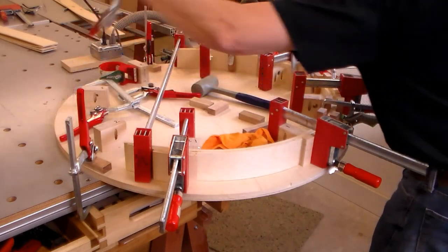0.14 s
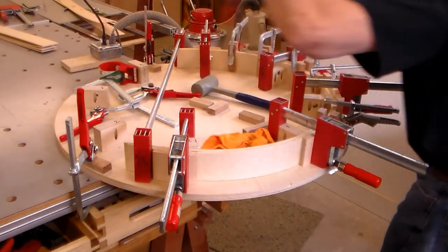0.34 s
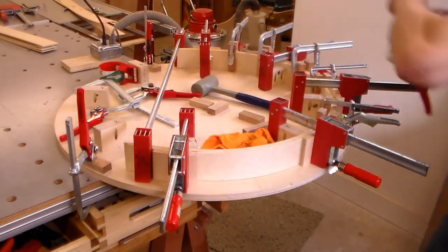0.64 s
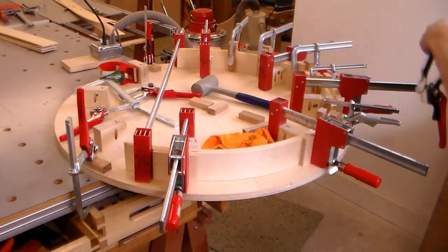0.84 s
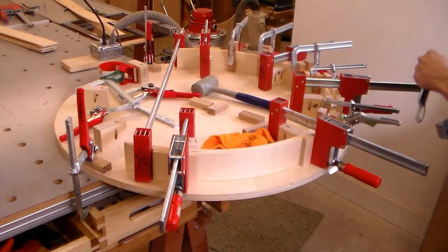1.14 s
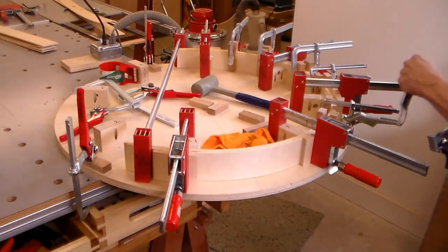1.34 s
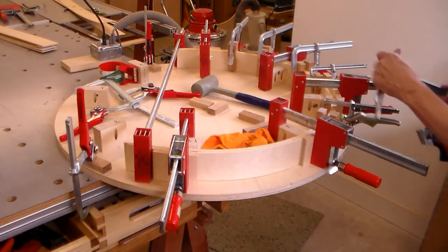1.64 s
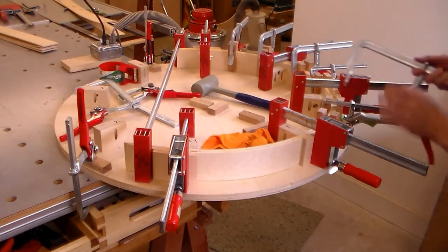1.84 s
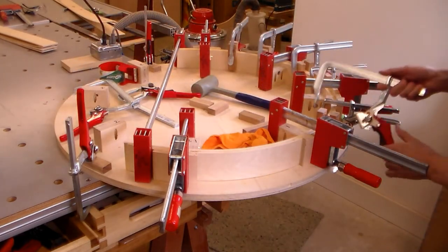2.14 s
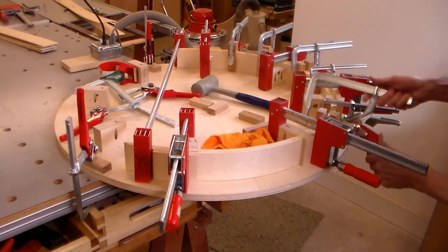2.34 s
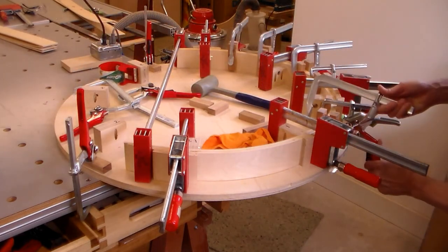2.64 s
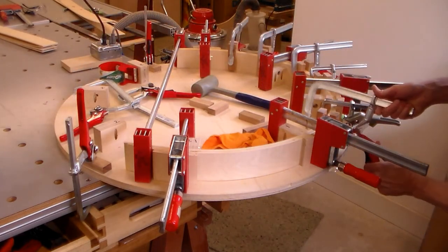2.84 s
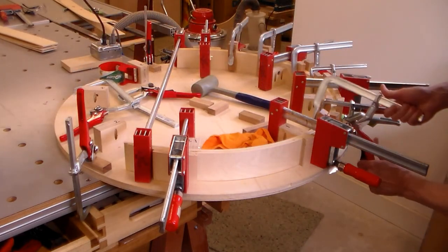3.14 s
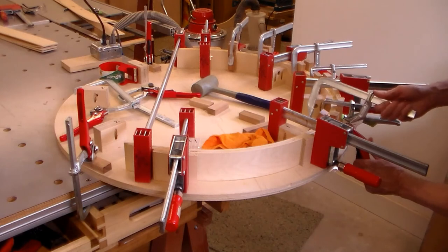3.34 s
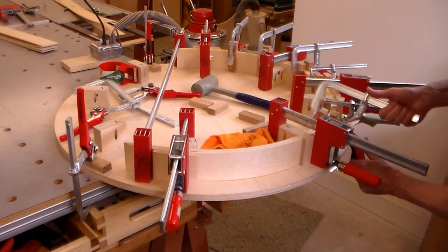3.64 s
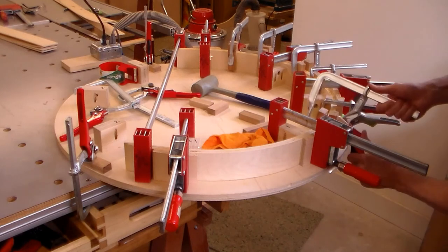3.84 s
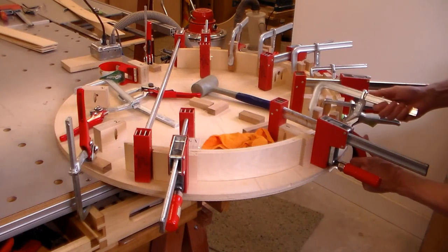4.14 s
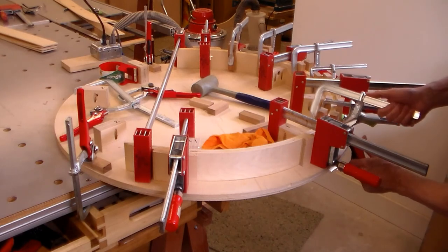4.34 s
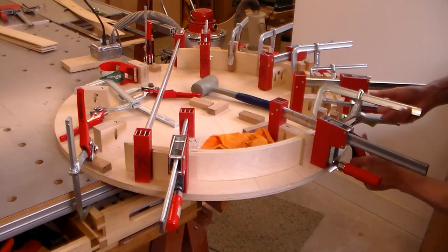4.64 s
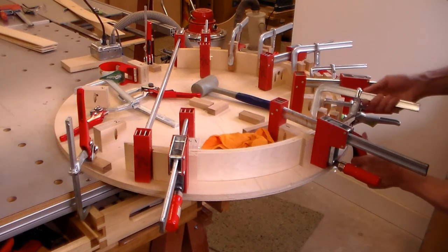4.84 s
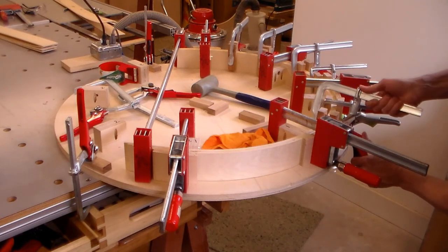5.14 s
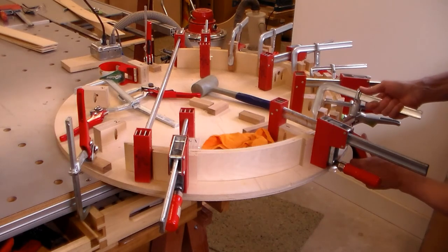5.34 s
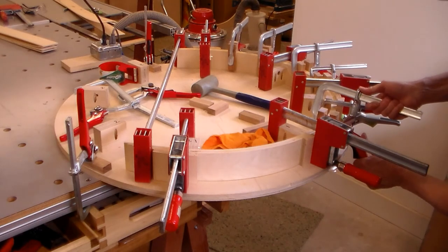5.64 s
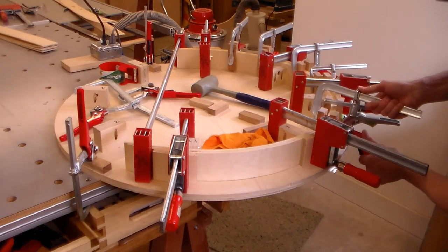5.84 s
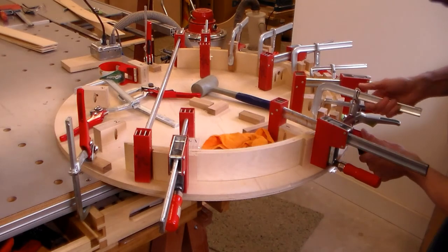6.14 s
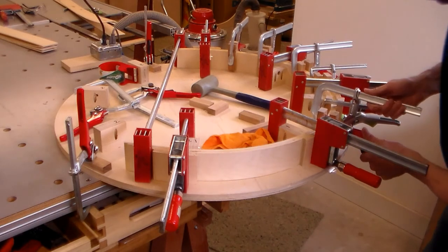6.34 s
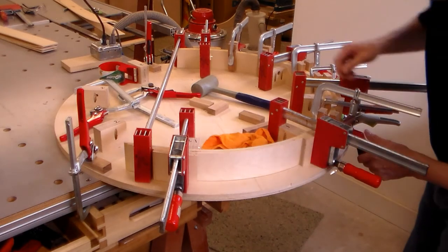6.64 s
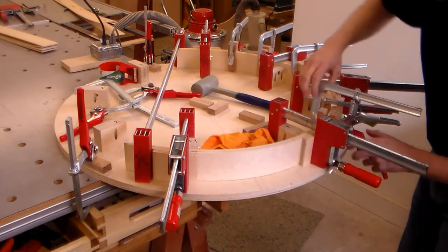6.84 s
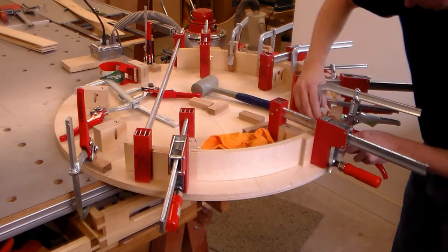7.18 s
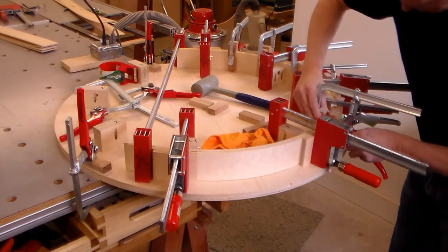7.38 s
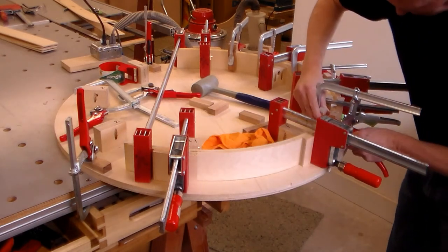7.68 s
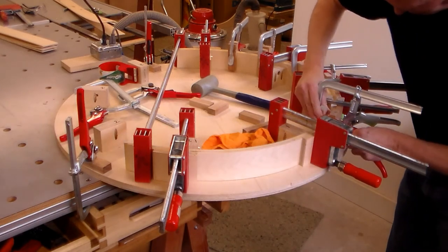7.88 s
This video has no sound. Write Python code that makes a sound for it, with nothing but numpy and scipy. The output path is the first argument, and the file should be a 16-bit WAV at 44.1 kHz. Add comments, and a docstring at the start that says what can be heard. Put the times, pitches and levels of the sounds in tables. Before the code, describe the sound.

Steel bar clamps clink, scrape and knock against each other and a wooden form in a small workshop, over a faint hum.

```python
"""Steel bar clamps are slid open, knocked together and set on a wooden form on a workbench.
Bars and jaws ring when struck and chatter as they slide; the wood knocks and rubs, the bench thumps.
The work sits a touch right of a camera's stereo microphone, in a small workshop that answers each blow.
Behind it a motor hums faintly in rumble and hiss. The gain control ducks after the loudest blows."""
import sys
import numpy as np
from scipy import signal
from scipy.fft import rfft, irfft, next_fast_len
from scipy.io import wavfile
from scipy.ndimage import uniform_filter1d, minimum_filter1d, map_coordinates

SR = 44100
rng = np.random.default_rng(int(sys.argv[2]) if len(sys.argv) > 2 else 0)


def unload_wav(signal):
    """Save mono or channel-first audio to the path in sys.argv[1] as 16-bit WAV at rate SR, clipped to [-1, 1]."""
    wavfile.write(
        sys.argv[1],
        SR,
        np.round(np.clip(np.atleast_2d(signal).T, -1, 1) * 32767).astype(np.int16),
    )


N = 353241
LIFE = int(.6 * SR)  # samples allowed for one ring or room tail

# A clamp meets wood. Each row: start in seconds, level in dB, contact hardness as a treble corner in Hz,
# seconds until it settles (up to 0.005 it lands flat).
WOOD_KNOCKS = [(0.326, -48, 950, 0.0025), (0.595, -32, 1160, 0), (0.653, -31.5, 1370, 0),
               (1.336, -59, 950, 0.00028), (3.913, -25.5, 1460, 0.024), (4.135, -37.5, 1570, 0.00023),
               (4.322, -27.5, 2101, 0.00095), (4.63, -38, 1530, 0.026), (4.848, -38, 1270, 0.00058),
               (5.116, -31.5, 1550, 0.014), (5.195, -32, 1130, 0.0012), (5.251, -32, 1510, 0.0036),
               (5.598, -36.5, 2040, 0.003), (5.627, -33.5, 1870, 0.0023), (5.791, -33.5, 1570, 0.0048),
               (6.071, -52.5, 851, 0), (6.532, -50, 1960, 0), (6.725, -24, 1360, .065),
               (7.533, -48, 1070, 0)]
# Steel meets steel. Each row: start in seconds, level in dB, ring against crack in dB, favoured ring in Hz.
STEEL_CLINKS = [(0.501, -41, -7, 5850), (0.653, -38, -20, 5540), (0.79, -48.5, -4, 4954),
                (1.027, -52, -8, 3320), (1.604, -52.5, -17, 5270), (1.797, -38, 10, 4950),
                (1.912, -34.5, -9, 5600), (2.064, -41.5, 13, 2880), (2.119, -39, 1, 3057),
                (3.609, -32, -25, 6500), (3.621, -31.5, 8, 5514), (3.869, -35.5, 5, 11876),
                (4.277, -42.5, 2, 5097), (4.631, -39, 0, 8977), (4.66, -40, -11, 5514),
                (4.698, -43.5, 3, 8977), (4.993, -39, 2, 3916), (5.108, -37, -7, 3400),
                (5.116, -26, -22, 3900), (5.128, -35.5, -18, 3300), (5.198, -41, 5.5, 8977),
                (5.261, -27, -8.5, 7761), (5.729, -29, -1, 5100), (5.734, -31.5, -1.5, 3600),
                (5.959, -49.5, -6, 4300), (6.535, -55.5, -7, 6400), (6.723, -29, -17, 3620),
                (7.532, -52, -14, 12160)]
# A jaw scrapes along its bar. Each row: start and end in seconds, level in dB, swell in dB,
# favoured ring in Hz at the start and at the end.
JAW_SLIDES = [(0.602, 0.716, -44, 2.5, 4750, 3870), (1.116, 1.164, -51, -2, 3230, 2900),
              (1.468, 1.49, -56.5, -2, 4600, 3500), (1.806, 1.888, -25, -0.5, 2800, 4000),
              (2.069, 2.139, -40.5, 2, 2700, 2900), (2.16, 2.19, -44.5, -0.5, 3800, 8977),
              (2.316, 2.396, -43.5, -4.5, 3400, 3140), (3.165, 3.188, -46.5, 3, 4550, 4900),
              (3.588, 3.66, -30.5, -5.5, 5430, 8977), (3.702, 3.775, -33, -7, 4660, 11876),
              (3.835, 3.903, -32, 1, 5070, 8977), (4.281, 4.32, -34.5, -4.5, 3120, 2700),
              (5.232, 5.27, -40.5, -2, 4570, 11876), (7.19, 7.245, -51, 0, 3580, 7100),
              (7.542, 7.762, -60, -1, 6400, 6520)]
# A clamp drags over wood. Each row: start and end in seconds, level in dB, contact hardness in Hz.
PAD_RUBS = [(0.343, 0.54, -49, 1160), (0.485, 0.697, -39.5, 1410), (3.841, 3.914, -54.5, 1310),
            (4.147, 4.257, -49.5, 793), (4.287, 4.377, -33, 1880), (4.48, 4.64, -52, 890),
            (4.636, 4.724, -42.5, 1250), (4.771, 4.92, -51.5, 1300), (7.193, 7.243, -50.5, 2270),
            (7.337, 7.806, -61, 1250)]
# Dull thumps on the bench. Each row: start in seconds, level in dB, favoured ring in Hz.
BENCH_THUMPS = [(0.478, -37.5, 213), (0.52, -44, 210), (0.588, -40.5, 209), (0.6, -38, 445),
                (0.662, -43, 209), (0.936, -56, 240), (4.18, -46, 394), (4.325, -29.5, 437),
                (4.362, -33, 387), (4.85, -42, 690), (5.793, -38, 706), (6.755, -40.5, 246.6)]
# Modes of the bars and jaws, the wooden form on the bench, and the bench's frame.
# Each row: frequency in Hz, relative level in dB, seconds to fall 60 dB.
STEEL_MODES = [(2228, -3, .22), (2680, -8, .1), (2900, -4, .18), (3057, -3, .2), (3620, -1, .28),
               (3790, -1, .38), (3850, -1, .35), (4613, -4, .25), (4764, -4, .33), (5103, -2, .28),
               (5514, -1, .3), (6390, -5, .25), (6490, -6, .22), (7693, -7, .22), (7817, -5, .25),
               (8977, -5, .28), (9787, -10, .18), (11876, -5, .24)]
WOOD_MODES = [(207, -3, .35), (242, -4, .25), (401, 0, .2), (520, -2, .2), (553, -3, .18), (641, -3, .22),
              (688, -1, .33), (759, 1, .22), (1032, -1, .17), (1268, 1, .17), (1400, -1, .17)]
BENCH_MODES = [(208, -3.5, 0.43), (247.3, -3, 0.39), (325.6, -3.5, 0.36), (403, 1.5, 0.25),
               (468, 4.5, 0.16), (718, 4.5, 0.22)]
# The short, dense part of a blow on steel and on wood. Each row: frequency in Hz, relative level in dB.
CRACK_SPECTRUM = [(100, -91), (600, -20), (1200, 0.5), (2000, 6.5), (3200, 9.5), (5200, 9), (7500, 3),
                  (10500, -2), (14000, -10), (16000, -75)]
KNOCK_SPECTRUM = [(50, -13), (120, -42), (200, -14), (330, -3.5), (520, 3.5), (750, 2), (950, -1.5),
                  (1300, 3.5), (3000, 4), (14000, -2)]
# The workshop's reverberation. Each row: frequency in Hz, seconds to fall 60 dB.
ROOM_DECAY = [(150, 0.45), (400, 0.51), (1000, 0.56), (2800, 0.44), (7000, 0.4), (14000, 0.29)]
# The motor's lines. Each row: frequency in Hz, mean rms level in dB.
MOTOR_LINES = [(29.8, -63.5), (59.6, -54), (119.2, -71.5), (178.8, -69)]
# Still air with microphone hiss, and low rumble. Each row: frequency in Hz, relative level in dB.
AIR_SPECTRUM = [(120, 5), (200, -12.5), (291, -3), (453, -6.5), (1040, -9.5), (2780, -12), (4650, -15),
                (14000, -17)]
RUMBLE_SPECTRUM = [(10, -14.5), (25, -4), (50, -9.5), (90, -18), (160, -20.5), (260, -20.5), (600, -42)]
# Left-right likeness of the room tail and of the air. Each row: frequency in Hz, coherence from 0 to 1.
ROOM_COHERENCE = [(300, 1), (1000, 0.98), (2000, 0.92), (4000, 0.41), (8000, 0.0056), (12000, 0.2)]
AIR_COHERENCE = [(60, 0.44), (180, 0.38), (540, 0.32), (1630, 0.4), (4910, 0.1), (14800, 0.01)]


def clinks():
    """Jaws and bars strike each other; a contact that favours low modes is duller, unless it is hard."""
    bright_hz, hard_blow_db, dull_db_per_octave = 5600, -33.5, 17.5
    track = np.zeros((2, N))
    for start, db, ring_db, ring_hz in STEEL_CLINKS:
        gentleness = 1 / (1 + np.exp(db - hard_blow_db))
        tilt_db = 2 - gentleness * dull_db_per_octave * max(np.log2(bright_hz / ring_hz), 0)
        clink = struck_steel(tilt_db, ring_db, ring_hz, t60=.013, rattle_hz=23.3)
        place(track, start, workshop(clink, wet_db=-2.5), db)
    return track


def slides():
    """A loose jaw chatters along its serrated bar in two overlapping grips, each with its own ring."""
    bright_hz, grit_hz = 5300, 4830
    track = np.zeros((2, N))
    for start, end, db, swell_db, start_hz, end_hz in JAW_SLIDES:
        grip_s = .58 * (end - start)
        for at, level_db, ring_hz in (start, db, start_hz), (end - grip_s, db + swell_db, end_hz):
            tilt_db = 5.5 + 6.5 * min(np.log2(ring_hz / bright_hz), 0)
            # mostly grit on the middle modes; low and high ones ring out
            ring_db = min(-24 + 33.5 * abs(np.log2(ring_hz / grit_hz)), 1)
            # the moving jaw keeps disturbing the bar's modes
            bar = struck_steel(tilt_db, ring_db, ring_hz, t60=.015, rattle_hz=71)
            scrape = signal.fftconvolve(slips(grip_s, per_second=1200, uneven_db=8), bar)
            place(track, at, workshop(scrape, wet_db=-3.5), level_db, grip_s)
    return track


def knocks():
    """Clamp heads bump the wooden form, flat or edge first, and their own steel is jolted."""
    edge_thud_db, settle_thud_db, loss_db_per_s = -11.5, 3.5, 309
    track = np.zeros((2, N))
    for start, db, hard_hz, settle_s in WOOD_KNOCKS:
        contacts = [(start, db, contact_thud_db(hard_hz))]
        if settle_s > .005:  # edge first: the weight follows, the weaker the longer it rocks
            settle_db = db + 4 - loss_db_per_s * settle_s
            contacts = [(start, db, edge_thud_db), (start + settle_s, settle_db, settle_thud_db)]
        for at, level_db, thud_db in contacts:
            knock = struck_wood(thud_db, hard_hz, t60=.022, ring_db=-11)
            place(track, at, workshop(knock, wet_db=-1), level_db)
        jolt = struck_steel(tilt_db=0, ring_db=-14, ring_hz=3080, t60=.009, rattle_hz=22.5)
        place(track, start, workshop(jolt, wet_db=2.5), db - 16)
    return track


def rubs():
    """Clamp pads judder over the wood, each slip a tiny knock."""
    track = np.zeros((2, N))
    for start, end, db, hard_hz in PAD_RUBS:
        judder = slips(end - start, per_second=450, uneven_db=2.5)
        form = struck_wood(contact_thud_db(hard_hz), hard_hz, t60=.027, ring_db=-13.5)
        drag = signal.fftconvolve(judder, form)
        place(track, start, workshop(drag, wet_db=-6), db, end - start)
    return track


def thumps():
    """Soft pushes wake only the bench's low modes, most of all those near one pitch."""
    track = np.zeros((2, N))
    for start, db, ring_hz in BENCH_THUMPS:
        frame = ringing(BENCH_MODES, lambda hz: 13 * near(hz, ring_hz, .36), detune=.0056, rattle_hz=11)
        place(track, start, workshop(frame, wet_db=-16), db)
    return track


def struck_steel(tilt_db, ring_db, ring_hz, t60, rattle_hz):
    """A crack, its treble tilted by tilt_db an octave, plus bar modes favoured near ring_hz."""
    slope_db = lambda hz: tilt_db * np.log2(np.maximum(hz, 3000) / 5000)
    crack_db = lambda hz: along(CRACK_SPECTRUM, hz) + slope_db(hz) + 4 * near(hz + 1, ring_hz, .31)
    mode_db = lambda hz: 13 * near(hz + 1, ring_hz, .059) + .5 * slope_db(hz)
    crack = coloured(burst(t60), crack_db)
    ring = ringing(STEEL_MODES, mode_db, detune=.00162, rattle_hz=rattle_hz)
    return crack / rms(crack) + amp(ring_db) * ring


def struck_wood(thud_db, hard_hz, t60, ring_db):
    """The form's answer: a heavy push wakes its low resonances, a soft contact takes away treble."""
    def contact_db(hz):
        shelf = 1 - 1 / (1 + (hz / hard_hz / 1.195) ** 8)
        rolloff_db = 7 * np.log10(1 + (hz / hard_hz / 2) ** 2)
        return thud_db * near(hz + 1, 290, .58) - 19 * shelf - rolloff_db

    knock = coloured(burst(t60), lambda hz: along(KNOCK_SPECTRUM, hz) + contact_db(hz))
    ring = ringing(WOOD_MODES, contact_db, detune=.0044, rattle_hz=15.7)
    return knock / rms(knock) + amp(ring_db) * ring


def contact_thud_db(hard_hz):
    """A softer contact lasts longer and so wakes more of the wood's bass."""
    return 1 + 2.5 * np.log2(1500 / hard_hz)


def burst(t60):
    """Countless short-lived modes: evened-out noise that swells as the blow spreads, then dies."""
    age = np.arange(LIFE) / SR / t60
    noise = rng.standard_normal(LIFE) * age ** .5 * np.exp(-np.log(1000) * age)
    power = np.abs(uniform_filter1d(np.abs(rfft(noise[:2048])) ** 2, size=21))
    return coloured(noise, lambda hz: -10 * np.log10(power + 1e-9))


def ringing(modes, weight_db, detune, rattle_hz):
    """Decaying modes of rms 1; each grip shifts their pitches and strengths, loose joints blur them."""
    hz, db, t60 = np.transpose(modes)[:, :, None]
    t = np.arange(LIFE) / SR
    strength = amp(db + weight_db(hz) + 2 * rng.standard_normal(hz.shape))
    strength *= rng.choice([-1, 1], hz.shape)
    pitch = hz * (1 + detune * rng.standard_normal(hz.shape))
    # a random walk of phase widens each mode to rattle_hz
    drift = np.cumsum(rng.uniform(-1, 1, (len(hz), LIFE)), axis=1) * np.sqrt(6 * np.pi / SR * rattle_hz)
    decay = np.exp(-np.log(1000) * t / t60)
    ring = np.sum(strength * decay * np.sin(2 * np.pi * pitch * t + drift), axis=0)
    return ring / rms(ring)


def slips(seconds, per_second, uneven_db):
    """Stick and slip: tiny blows of uneven size at random times under one stroke."""
    stroke = np.arange(LIFE) / SR / max(seconds, .01)
    sizes = amp(uneven_db * np.clip(rng.standard_normal(LIFE), -2, 2)) * rng.choice([-1, 1], LIFE)
    slipping = rng.random(LIFE) < per_second / SR
    arch = np.abs(np.sin(np.pi * stroke)) ** .5
    return (slipping * sizes * arch)[stroke < 1]


def workshop(x, wet_db):
    """At the microphone: direct sound, weak bounces off the bench, a tail whose bass builds slowly."""
    hz, t, noise = signal.stft(rng.standard_normal((2, LIFE)), SR, nperseg=256)
    hz = hz[:, None]
    build = 1 - np.exp(-t * (np.minimum(hz, 1500) + 50) / 8)
    bass_lift = amp(6 / (1 + (hz / 450) ** 2))
    decay = np.exp(-np.log(1000) * t / along(ROOM_DECAY, hz))
    tail = signal.istft(noise * build * bass_lift * decay, SR, nperseg=256)[1]
    tail = spread(tail, ROOM_COHERENCE)
    answer = amp(wet_db) * tail / np.linalg.norm(tail[0])
    answer[:, 0] += 1  # direct sound
    bounces = (rng.uniform(.002, .014, 6) * SR).astype(int)
    answer[:, bounces] += .22 * rng.choice([-1, 1], 6)
    return signal.fftconvolve(x[None], answer, axes=1)


def motor_hum():
    """A faint, slightly unsteady motor, a shade louder on the right and slowly swelling."""
    clock = np.arange(N) / SR + .0004 * wobble(1.5)
    hum = sum(amp(db) * np.sqrt(2) * np.sin(2 * np.pi * (hz * clock + rng.random()))
              for hz, db in MOTOR_LINES)
    swell_db = .7 * wobble(2.82) + np.linspace(-1.2, 1.5, N)
    return hum * amp(swell_db) * amp([[-.7], [.7]])


def room_tone(spectrum, db):
    """Steady noise under the work, spread wide across the microphone pair."""
    noise = spread(rng.standard_normal((2, N)), AIR_COHERENCE)
    noise = filtered(noise, lambda hz: amp(along(spectrum, hz)))
    return amp(db) * noise / rms(noise)


def from_the_right(x, lag_s):
    """The sound reaches the left microphone port a moment after the right one."""
    return filtered(x, lambda hz: np.exp(np.array([[-1j], [1j]]) * np.pi * hz * lag_s))


def gain_control(x, limit_db, hold_s, release_s):
    """Loud sound pulls the gain down at once; it stays down a while, then creeps back."""
    def past(seconds):
        half = int(seconds * SR / 2)
        return dict(size=2 * half + 1, origin=half, mode="nearest")

    power = np.abs(uniform_filter1d(np.mean(x ** 2, axis=0), **past(.004))) + 1e-12
    cut_db = np.minimum(limit_db - 10 * np.log10(power), 0)
    held_db = minimum_filter1d(cut_db, **past(hold_s))
    return x * amp(np.minimum(held_db, uniform_filter1d(held_db, **past(release_s))))


def place(track, at, sound, db, seconds=.025):
    """Add a sound so that its first stretch has the given rms level."""
    start = max(round(at * SR), 0)
    part = sound[:, :N - start]
    opening = sound.mean(0)[:int(max(seconds, .01) * SR)]
    track[:, start:start + part.shape[1]] += amp(db) * part / rms(opening)


def amp(db):
    return 10 ** (np.asarray(db) / 20)


def rms(x):
    return np.sqrt(np.mean(x ** 2) + 1e-20)


def near(hz, centre_hz, width):
    """A bell of height 1 on a log frequency axis."""
    return np.exp(-(np.log(hz / centre_hz) / width) ** 2)


def along(points, hz):
    """Interpolate (Hz, value) points on a log axis."""
    knots_hz, values = np.transpose(points)
    return np.interp(np.log(hz + 1), np.log(knots_hz + 1), values)


def filtered(x, response):
    """Apply a gain given as a function of frequency."""
    n = x.shape[-1]
    padded = next_fast_len(n + 4096)
    return irfft(rfft(x, padded) * response(np.fft.rfftfreq(padded, 1 / SR)), padded)[..., :n]


def coloured(x, db_of_hz, size=2048):
    """Minimum-phase colour: nothing sounds before the blow."""
    cepstrum = irfft(np.log(amp(db_of_hz(np.fft.rfftfreq(size, 1 / SR))) + 1e-6))
    cepstrum[1:size // 2] *= 2
    cepstrum[size // 2 + 1:] = 0
    return signal.fftconvolve(x, irfft(np.exp(rfft(cepstrum))))[:len(x)]


def spread(pair, coherence):
    """Two unrelated noises become left and right of a given likeness."""
    turn = lambda hz: np.arccos(np.clip(along(coherence, hz), -1, 1)) / 2
    mid, side = filtered(pair, lambda hz: np.array([np.cos(turn(hz)), np.sin(turn(hz))]))
    return np.array([mid + side, mid - side])


def wobble(rate):
    """A smooth random curve, rate knots a second."""
    return map_coordinates(rng.standard_normal(int(N * rate / SR) + 4), [np.arange(N) * rate / SR])


def scene():
    """Clamp work just right of the microphone's axis, with motor, hiss and rumble behind it."""
    handling = from_the_right(clinks() + slides() + knocks() + rubs() + thumps(), lag_s=15e-6)
    return handling + motor_hum() + room_tone(AIR_SPECTRUM, db=-59) + room_tone(RUMBLE_SPECTRUM, db=-59.5)


def record(dry):
    """The camera rides its gain, rounds off the tallest peaks and keeps nothing above its band limit."""
    ceiling, top_hz = .27, 14300
    ducked = gain_control(dry, limit_db=-21, hold_s=.38, release_s=.16)
    rounded = ducked / (1 + (ducked / ceiling) ** 4) ** .25
    return filtered(rounded, lambda hz: hz < top_hz)


dry = scene()
out = record(dry)
unload_wav(out)
```